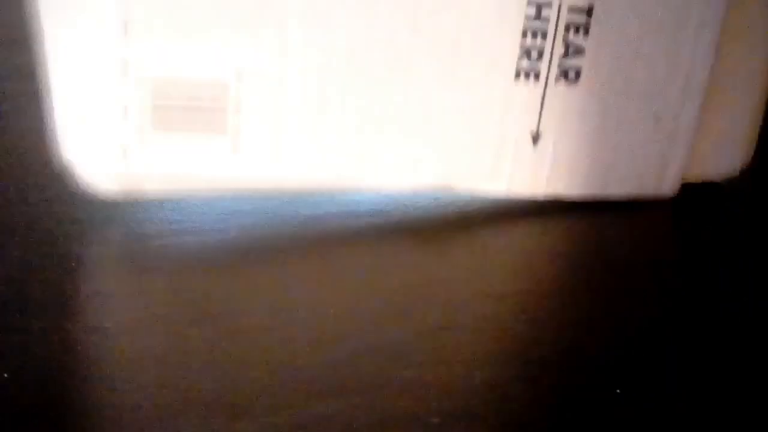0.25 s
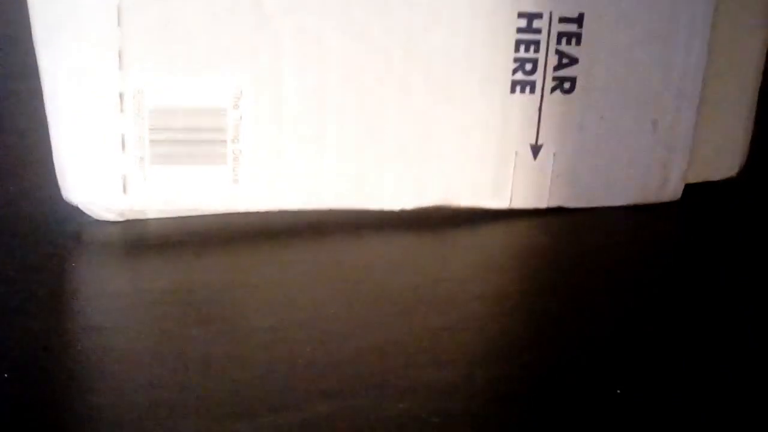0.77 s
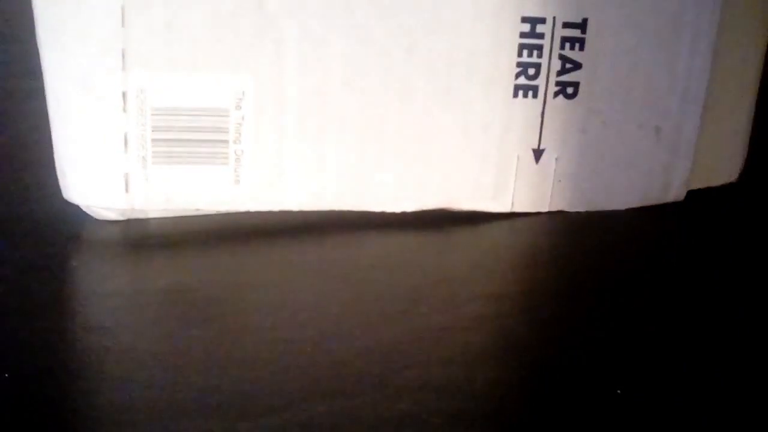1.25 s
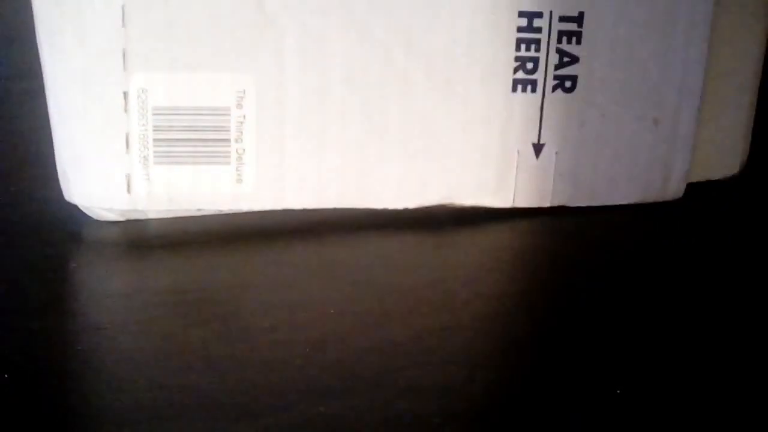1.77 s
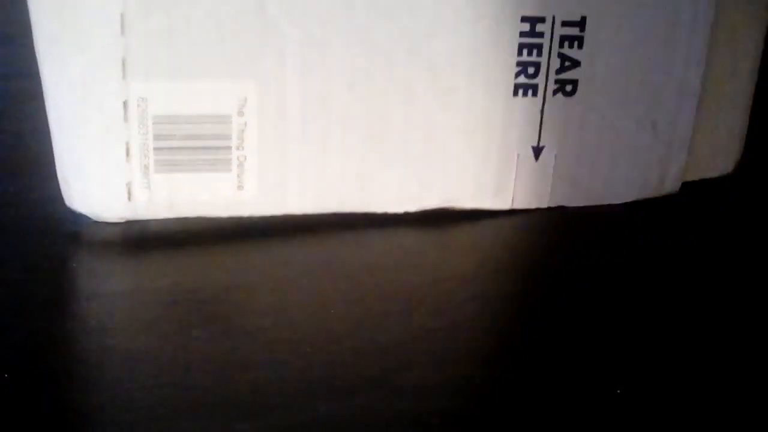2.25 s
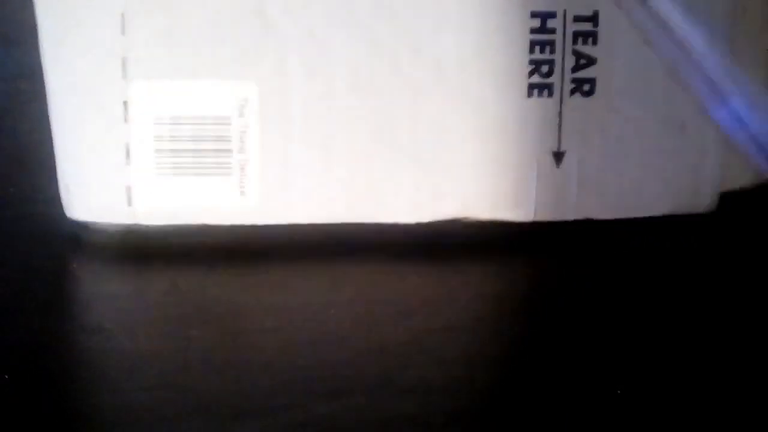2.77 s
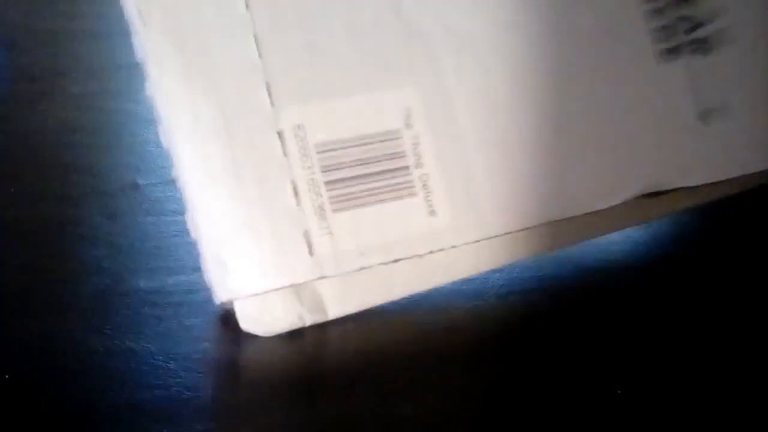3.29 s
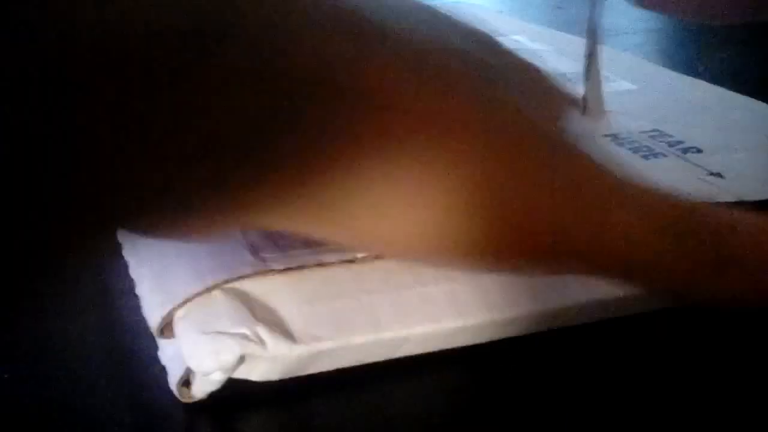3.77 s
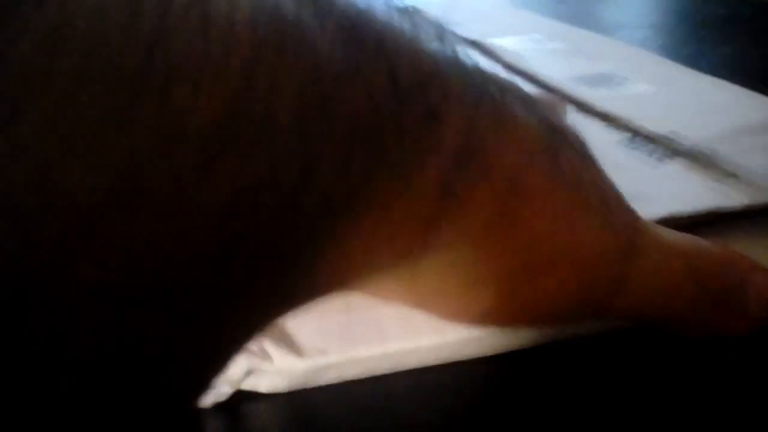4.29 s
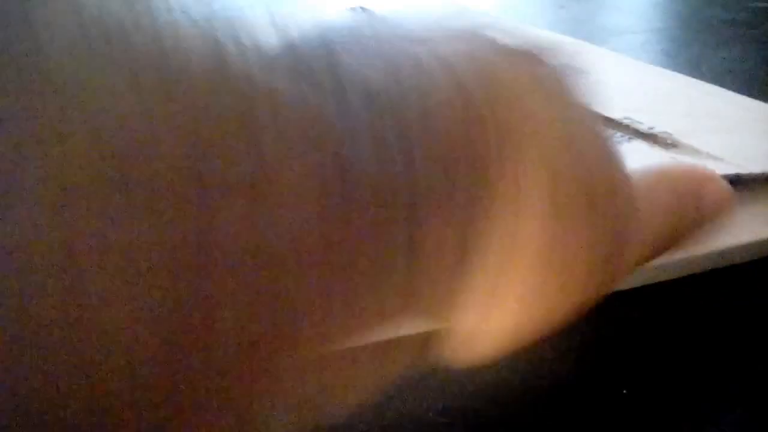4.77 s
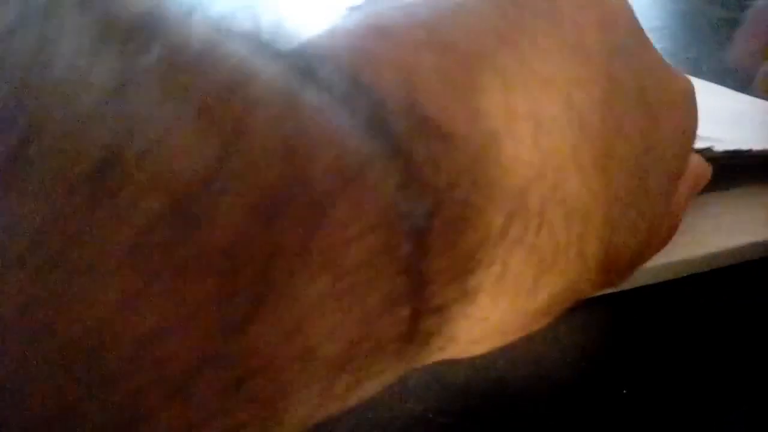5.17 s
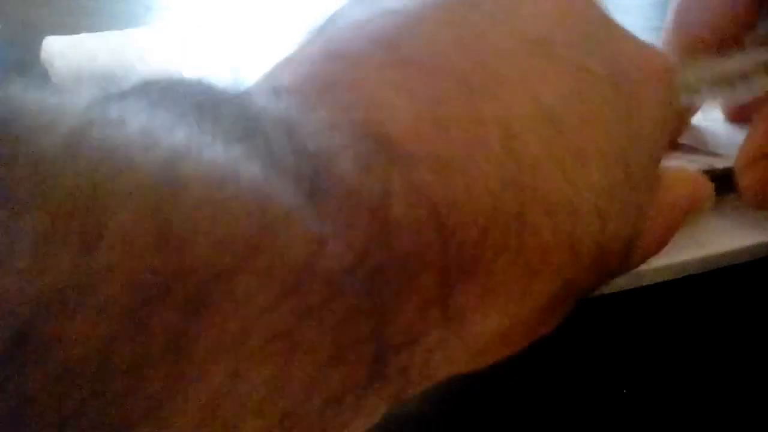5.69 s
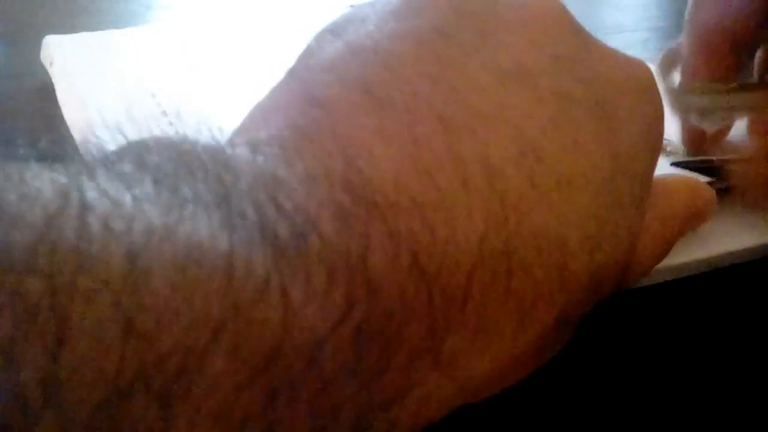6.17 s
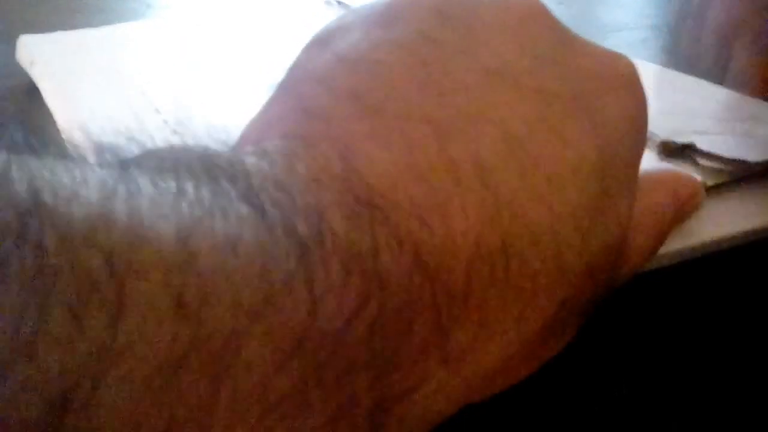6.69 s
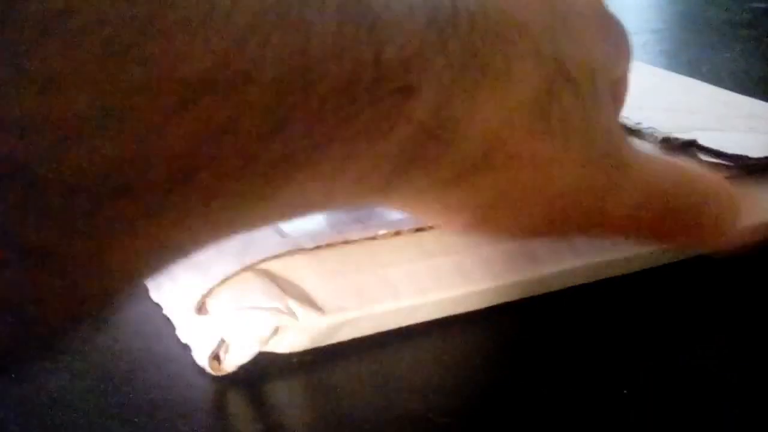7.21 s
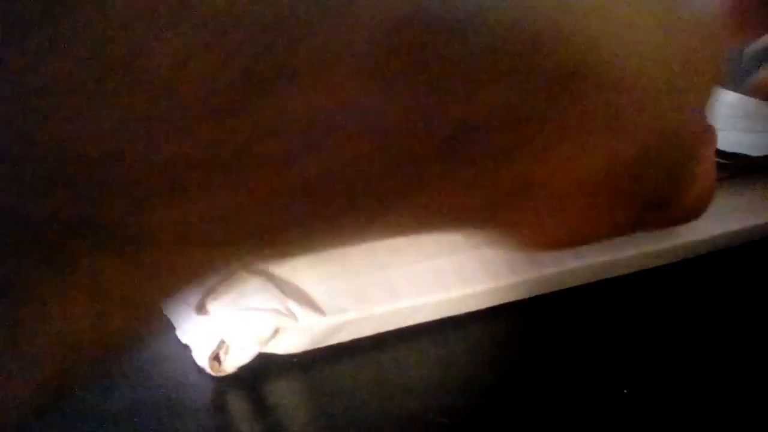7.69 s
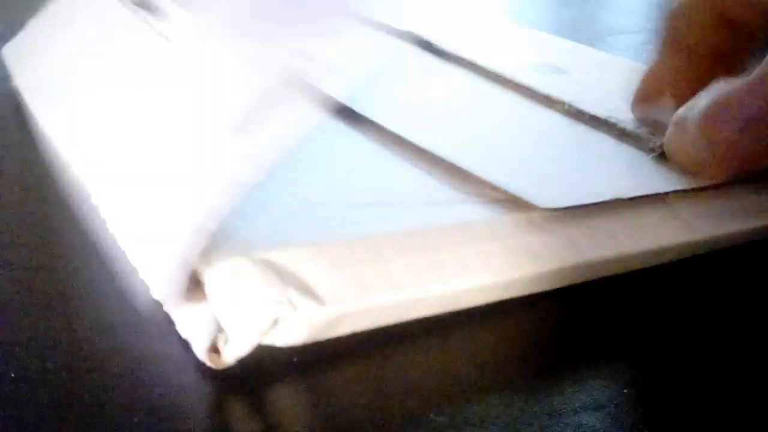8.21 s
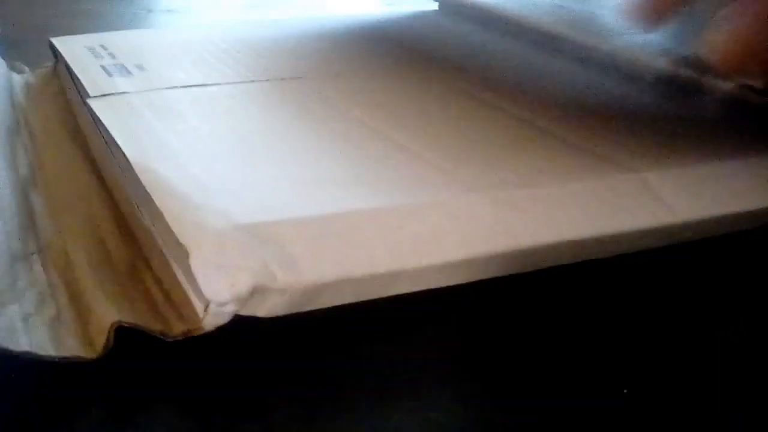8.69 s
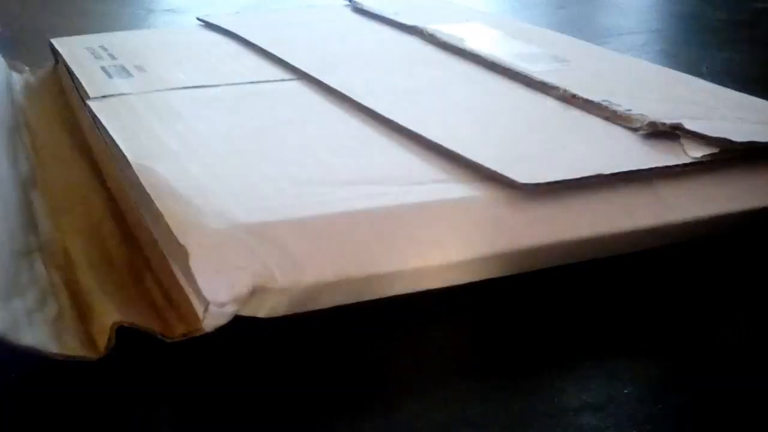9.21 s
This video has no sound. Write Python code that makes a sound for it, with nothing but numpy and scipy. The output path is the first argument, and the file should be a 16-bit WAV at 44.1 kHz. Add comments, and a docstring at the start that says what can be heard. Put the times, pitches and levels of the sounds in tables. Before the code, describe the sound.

A cardboard mailer is ripped open by hand in short buzzing tears, with sharp snaps and light scrapes in a quiet room.

```python
"""A cardboard mailer is torn open by hand on a table, close up in a small quiet room with a faint hum.
First, a few snaps and table bumps; hands and board brush lightly from here on. Pulls at 1.2 s and 2.5 s
rip across the flutes: rough panel buzz, fizz of fibres. Near 3.8 s the flap gives way in sharp snaps.
A third pull at 4.2 s ends with a metallic ping. Scuffs and paper ticks follow; at 8.1 s the flap slaps
open, then light handling continues."""
import sys
import numpy as np
from scipy import signal
from scipy.fft import rfft, irfft, next_fast_len
from scipy.io import wavfile
from scipy.ndimage import uniform_filter1d

SR = 44100
rng = np.random.default_rng(int(sys.argv[2]) if len(sys.argv) > 2 else 0)


def to_wav(s):
    """Save 16-bit WAV."""
    ch = np.atleast_2d(s).T  # columns
    pcm = np.round(np.clip(ch, -1, 1) * 32767)  # PCM
    wavfile.write(sys.argv[1], SR, pcm.astype(np.int16))


N = 416744
TIME_S = np.arange(N) / SR

# Spectra. Each row: frequency in Hz, relative density in dB.
AIR_SPECTRUM = [(15, -34), (25, -20), (91, -12), (113, -10.5), (209, -6), (240, 0.5), (267, -8),
                (359, -9.5), (482, -14.5), (782, -15.5), (848, -15.5), (1410, -19.5), (2360, -25),
                (4600, -33), (6500, -34), (7800, -48), (10900, -56), (15500, -88)]
CRACK_SPECTRUM = [(500, -24.5), (1100, 5), (1400, 0.5), (1650, 6), (1900, 7), (2200, 3.5), (2600, -1),
                  (3050, -0.5), (3450, -3), (3850, -5), (4600, -15), (5400, -11.5), (6500, -9),
                  (8500, -23.5), (11500, -32), (15500, -45)]  # cracking fibres
BUMP_SPECTRUM = [(25, -10), (45, -23), (80, 8), (130, -11.5), (250, -12), (500, -15.5), (1500, -47),
                 (5000, -68)]  # mailer on table
BRUSH_SPECTRUM = [(300, -2), (1000, 9.5), (2500, 6), (4200, 2), (6400, 3.5), (8000, -6), (11000, -10.5),
                  (15500, -24)]  # paper on paper
SKIN_SPECTRUM = [(1500, -18), (4500, -5.5), (6800, 2.5), (8500, -3), (11000, -9), (12300, -19),
                 (15500, -20)]  # fingers on the smooth face
RUB_SPECTRUM = [(300, -26), (800, -1), (1200, 1), (1500, -4.5), (1900, -15), (2600, -11), (6000, -32)]  # edge on panel
PANEL_SPECTRUM_1 = [(26, -46), (45, -24), (76, 3.5), (190, -4.5), (230, -1.5), (322, -5.5), (520, -10.5),
                    (753, -17), (848, -8.5), (939, -16), (1270, -16), (1560, -28.5), (2000, -30.5),
                    (2400, -39), (3380, -64), (5720, -120)]  # board, pulls 1-3
PANEL_SPECTRUM_2 = [(26, -49), (45, -18), (71, -8), (172, 0), (204, -1), (328, -1), (437, 0), (536, -13.5),
                    (680, -15), (834, -18), (1040, -14.5), (1250, -26.5), (1460, -16), (1700, -28.5),
                    (2060, -24.5), (2250, -38), (2600, -35), (3380, -65), (5720, -120)]
PANEL_SPECTRUM_3 = [(26, -16), (45, -12), (80, 3), (158, -5.5), (317, 2.5), (430, -7.5), (564, -3.5),
                    (766, -9.5), (923, -9.5), (1300, -15.5), (2600, -23.5), (3380, -55), (5720, -120)]
FIZZ_SPECTRUM_1 = [(1410, -31), (2400, -4), (3010, -4.5), (3920, -6.5), (5120, -5.5), (6080, -6.5),
                   (7620, -4.5), (15500, -22)]  # tearing fibres, pulls 1-3
FIZZ_SPECTRUM_2 = [(1410, -28), (2400, -5.5), (4480, -4.5), (5240, -2.5), (6320, -2), (11800, -14.5),
                   (15500, -21)]
FIZZ_SPECTRUM_3 = [(1410, -18), (2400, -7), (3740, -6), (4590, -11.5), (6620, -2), (9700, -16.5),
                   (14800, -22), (15500, -25)]

# Mains hum. Each row: frequency in Hz, level in dB.
HUM_PARTIALS = [(120, -61), (238, -63)]
# Fibre bundles snapping. Each row: start in seconds, thud level in dB, panel pitch in Hz,
# crack level in dB, crack decay in seconds, ring of the torn edge in Hz.
SNAPS = [(0.18, -41.5, 870, -37.5, .005, 3320), (0.194, -39.5, 710, -44, 0.0077, 1700),
         (0.2207, -23, 647, -30, 0.0017, 3900), (0.259, -34, 644, -35.5, 0.0026, 1250),
         (0.2694, -25, 524, -35.5, 0.0016, 2190), (1.223, -33, 700, -47, 0.0018, 1200),
         (1.252, -35, 650, -42, .002, 3100), (1.268, -23.5, 600, -36, 0.0056, 3100),
         (1.2891, -24.5, 545, -39, .003, 3100), (1.296, -25, 700, -39, .002, 3100),
         (1.353, -23.5, 700, -41, .003, 1200), (1.365, -27, 640, -35.5, .002, 3300),
         (2.5415, -31.5, 900, -46, .002, 2200), (2.6075, -30, 480, -51, .002, 2200),
         (2.7397, -22, 680, -43, 0.0025, 1450), (2.835, -23, 483, -40, .003, 2000),
         (2.8853, -19, 484, -36, .002, 1600), (2.899, -22.5, 695, -27, .0015, 1550),
         (2.9077, -26, 624, -31.5, .0014, 1990), (2.924, -26, 497, -38, 0.0018, 2000),
         (3.7146, -19, 777, -30.5, 0.011, 1700), (3.737, -22, 484, -31.5, 0.0058, 1700),
         (3.7545, -34, 800, -40, .0012, 3300), (3.7617, -25.5, 615, -39, 0.002, 1900),
         (3.791, -26.5, 700, -29, 0.0015, 2900), (3.7974, -22.5, 468, -33, .0024, 2600),
         (3.8143, -17, 663, -30, 0.002, 2400), (3.8478, -19.5, 414, -17.5, 0.0017, 1700),
         (3.859, -20.5, 634, -31, .0015, 2300), (3.8643, -11.5, 604, -18, 0.002, 1950),
         (3.8829, -17.5, 640, -24.5, 0.0011, 1600), (3.914, -19.5, 534, -24.5, 0.0017, 2800),
         (3.9356, -20.5, 654, -33, 0.0013, 2400), (3.9665, -29.5, 580, -33, 0.0012, 2900),
         (3.987, -24.5, 636, -35, 0.0018, 2300), (4.2583, -32.5, 960, -37.5, .002, 6500),
         (4.2945, -21.5, 550, -33, 0.0037, 1900), (4.3237, -24.5, 644, -33, .0015, 2400),
         (4.353, -31, 740, -40, .002, 1600), (4.3665, -29, 584, -35, 0.002, 3200),
         (4.384, -34, 600, -44, .002, 2300), (4.435, -33, 620, -42, .002, 6800),
         (4.4608, -31, 510, -30.5, 0.0015, 3000), (4.489, -25.5, 517, -33.5, .0012, 2200),
         (4.5168, -26.5, 614, -40, 0.0033, 3400), (4.5275, -28, 710, -26.5, 0.0022, 7800),
         (4.5315, -20, 614, -23.5, .0024, 3200), (4.585, -33.5, 467, -39.5, .0018, 3000),
         (4.623, -23, 520, -32.5, 0.0018, 2000), (4.643, -31.5, 634, -43.5, 0.015, 1900),
         (4.7184, -31.5, 655, -33.5, 0.0016, 2900), (4.7587, -32, 498, -43, 0.0009, 2000),
         (5.976, -42, 507, -42.5, 0.0066, 1700), (6.019, -38, 520, -58, .003, 3200),
         (6.026, -42, 480, -54, .002, 2200), (6.809, -30, 694, -33.5, 0.004, 4300),
         (6.8173, -35, 736, -23.5, 0.0013, 3500), (6.8318, -24.5, 520, -31.5, 0.0022, 1700),
         (6.847, -29.5, 660, -40, 0.0021, 2400), (6.9153, -28.5, 540, -35.5, 0.0014, 2600),
         (7.569, -51.5, 895, -46, .003, 4500)]
# Table bumps. Each row: start in seconds, level in dB, decay in seconds.
BUMPS = [(.182, -33, 0.045), (.33, -40.5, 0.036), (2.53, -28.5, 0.098), (3.29, -49, 0.054),
         (3.715, -34, 0.065), (3.86, -37.5, 0.15), (4.529, -43, 0.1), (5.975, -40, 0.046),
         (6.82, -24, 0.029), (8.082, -38.5, 0.033), (8.97, -49.5, 0.089), (9.239, -49, 0.038)]
# Light strokes. Each row: peak time in seconds, length in seconds, nominal level in dB, skin share 0-1.
STROKES = [(0.36, 0.27, -61, 0), (0.694, 0.49, -65.5, 0.14), (1.1, 0.16, -52, 0.85), (1.6, 0.39, -65, 0.1),
           (1.833, 0.029, -58, 0.72), (2.266, 0.16, -53.5, 0.47), (2.43, 0.089, -59, 0.2),
           (0.927, 0.17, -60.5, 0), (3.045, 0.16, -52, 0), (3.195, 0.05, -52.5, 0.8),
           (3.393, 0.038, -59.5, 1), (3.538, 0.15, -55.5, 0.63), (4.208, 0.25, -53.5, 0),
           (4.936, 0.32, -56.5, 0), (5.133, .09, -63, 0), (5.267, 0.078, -60, 0.03),
           (5.485, 0.095, -61.5, 0.55), (5.72, 0.3, -65, 0.3), (5.933, 0.17, -61.5, 0.35),
           (6.22, 0.25, -63, 0.3), (6.39, 0.047, -54.5, 0.14), (6.69, 0.13, -57, 0),
           (7.047, 0.076, -59.5, 0.15), (7.274, 0.11, -57, 0.5), (7.47, 0.27, -66, 0.12),
           (7.618, 0.054, -54.5, 0), (7.887, 0.19, -63, 0), (8.19, 0.16, -57.5, 0.4),
           (8.405, 0.15, -54.5, 0.2), (8.695, 0.17, -54, 0.05), (8.858, 0.077, -55.5, 0.3),
           (9.053, 0.12, -58.5, 0.66), (9.198, 0.11, -57.5, .6), (9.326, 0.056, -58.5, 0.34),
           (9.43, 0.077, -61.5, 0.4)]
# Hand force, one curve a pull. Each row: time in seconds, panel level in dB, fizz level in dB.
PULL_LEVELS = [
    [(1.16, -65, -58), (1.186, -36, -42.5), (1.218, -36, -49), (1.226, -29.5, -39), (1.258, -25.5, -40.5),
     (1.36, -22, -37), (1.41, -21, -39.5), (1.452, -22, -38.5), (1.47, -31, -49.5), (1.514, -37, -49.5),
     (1.54, -48, -66), (1.56, -64, -51)],
    [(2.45, -62, -58), (2.524, -29, -38.5), (2.558, -26, -43.5), (2.605, -23.5, -41.5),
     (2.645, -27.5, -40.5), (2.685, -19, -39.5), (2.746, -18.5, -38), (2.784, -26, -42),
     (2.855, -22, -41.5), (2.885, -12, -32), (2.908, -14.5, -34.5), (2.942, -31, -55), (2.99, -48, -73)],
    [(4.22, -59, -61), (4.236, -54, -70), (4.248, -36.5, -43), (4.29, -24, -39.5), (4.31, -31, -46.5),
     (4.336, -30.5, -46.5), (4.468, -28, -39.5), (4.51, -43, -51)],
]
# Tear speed, one curve a pull. Each row: time in seconds, flutes per second, freed panel's ring in Hz.
PULL_SPEEDS = [
    [(1.22, 119, 800), (1.255, 139, 846), (1.3, 162, 900), (1.335, 220, 850), (1.35, 244, 800),
     (1.425, 225, 1150), (1.48, 82, 1000)],
    [(2.5, 94.5, 900), (2.6, 91.7, 900), (2.64, 125, 780), (2.69, 250, 720), (2.745, 230, 690),
     (2.81, 117, 760), (2.88, 346, 623), (2.92, 305, 430), (2.96, 121, 430)],
    [(4.22, 100, 600), (4.28, 109, 560), (4.345, 70, 600), (4.4, 112, 540), (4.43, 94, 480),
     (4.47, 120, 560)],
]
# A slow tear stumbles, a fast one runs evenly. Each row: flutes per second, unevenness 0-1.
UNEVEN_BY_SPEED = [(105, .6), (232, .2)]
# Narrow rasp. Each row: top speed so far in flutes per second, pitch in Hz, level in dB re fizz.
RASP_BY_SPEED = [(80, 2900, -26), (120, 3000, -20), (140, 3030, -5), (215, 3100, -6), (239, 5250, -10),
                 (339.8, 5560, -10)]
# Paper edge ticks. Each row: start in seconds, peak in dB, centre in Hz.
TICKS = [(2.018, -51, 500), (3.615, -33.5, 6340), (3.879, -24, 3600), (4.028, -34.5, 2300),
         (4.166, -30, 2560), (5.9177, -34, 2780), (6.627, -41, 2980), (7.279, -42, 6500),
         (7.311, -43, 6000), (7.334, -42, 5000), (7.5694, -28, 3600), (8.038, -40.5, 2200),
         (8.0765, -27, 4000), (8.635, -40, 4000), (8.8843, -40, 4000), (9.003, -47, 7500),
         (9.068, -44, 7000), (9.199, -46, 7500), (9.304, -40, 1800)]
# Edge rubs. Each row: peak time in seconds, half-width in seconds, level in dB.
RUBS = [(2.19, 0.023, -59), (3.05, .03, -53), (2.5, 0.028, -44.5), (2.55, 0.03, -38.5), (5.015, .08, -64),
        (8.218, .02, -57), (8.291, 0.011, -54), (8.68, 0.054, -62), (8.86, 0.057, -65)]
# Board scuffs. Each row: peak time, rise and fall in seconds, hiss level in dB, body level in dB.
SCUFFS = [(3.729, 0.005, 0.024, -42.5, -21.5), (3.81, .025, 0.043, -52, -40),
          (4.168, 0.0029, 0.011, -47, -39.5), (4.575, 0.038, 0.019, -49, -31.5),
          (5.977, 0.017, 0.015, -41.5, -45), (6.017, 0.0041, 0.016, -46, -41),
          (6.782, 0.0091, 0.017, -34, -38.5), (6.82, 0.0088, .026, -38, -36),
          (7.055, 0.0096, 0.0085, -50.5, -54), (8.093, 0.0067, 0.014, -48, -36),
          (8.39, 0.018, .03, -52.5, -57)]
# Modes of a small metal object and of the flap. Each row: frequency in Hz, gain in dB, T60 in seconds.
METAL_PING_MODES = [(1150, -19.5, 0.048), (1406, -16.5, 0.042), (1685, -21, 0.044), (2310, -32, 0.11),
                    (2550, -27, .04), (5970, -21.5, 0.042)]
FLAP_MODES = [(850, -29, 0.0035), (1105, -1, 0.01), (1320, -5, 0.011)]
# Room decay. Each row: frequency in Hz, T60 in seconds.
ROOM_T60 = [(150, 0.39), (600, 0.28), (2000, 0.17), (6000, 0.27), (14000, 0.41)]


def amp(db):
    """Decibels to gain."""
    return 10 ** (np.asarray(db) / 20)


def unit(x):
    """Scales to rms 1."""
    return x / np.sqrt(np.mean(x ** 2) + 1e-20)


def read(points, hz):
    """Interpolates (Hz, value) points on a log-frequency axis."""
    point_hz, value = np.transpose(points)
    return np.interp(np.log(hz + 1), np.log(point_hz + 1), value)


def add(mix, start_s, sound):
    """Mixes a sound in at start_s."""
    part = mix[max(round(start_s * SR), 0):][:len(sound)]
    part += sound[:len(part)]


def colour(x, spectrum, size=4096):
    """Minimum-phase filter: rings only after each click."""
    log_gain = np.log(amp(read(spectrum, abs(np.fft.fftfreq(size, 1 / SR)))))
    taps = np.fft.ifft(np.exp(np.conj(signal.hilbert(log_gain)))).real
    return signal.fftconvolve(x, taps[:size // 2])[:len(x)]


def band(x, hz, kind, order=4):
    """Low-pass or high-pass."""
    return signal.sosfilt(signal.butter(order, hz, kind, fs=SR, output="sos"), x)


def resonate(x, hz, width_hz):
    """Unity-gain resonance following the curve hz."""
    turn, pole = np.exp(2j * np.pi * np.cumsum(hz) / SR), np.exp(-np.pi * width_hz / SR)
    return 2 * (turn * signal.lfilter([1 - pole], [1, -pole], x / turn)).real


def wander(n, per_s):
    """Random drift, rms 1."""
    knots = rng.standard_normal(4096)
    return unit(np.interp(np.arange(n) * per_s / SR % 4095, np.arange(4096), knots))


def running_rms(x, size=1500):
    """Rms over a sliding window of size samples."""
    return np.sqrt(abs(uniform_filter1d(x ** 2, size)) + 1e-12)


def steady(x, size=1500):
    """Flattens slow level changes, keeps the grain."""
    return x / running_rms(x, size)


def modes(rows, t):
    """Sum of decaying sines."""
    return sum(amp(db - 60 * t / t60_s) * np.sin(2 * np.pi * hz * t) for hz, db, t60_s in rows)


def fibres(n, per_s, spread_db):
    """Tiny clicks of breaking fibres, a few much larger than the rest."""
    height = amp(spread_db * np.minimum(rng.exponential(1, n), 4))
    return height * rng.choice([-1., 1.], n) * (rng.random(n) < per_s / SR)


def tick(peak_db, hz, decay_s=0.0013, top_hz=8300, size=1300):
    """Brief noise burst in one broad hump; soft paper has little top."""
    burst = rng.standard_normal(size) * np.exp(-np.arange(size) / (decay_s * SR))
    burst[0] += 3  # first contact
    hump = [(hz / 8, -20), (hz / 2.55, -1), (hz, 0), (1.45 * hz, -6), (4 * hz, -20)]
    click = band(colour(burst, hump), top_hz, "low", order=2)
    return amp(peak_db) * click / abs(click).max()


def background(air_db=-54):
    """Room air and a wavering mains hum."""
    out = amp(air_db) * unit(colour(rng.standard_normal(N), AIR_SPECTRUM))
    for hz, db in HUM_PARTIALS:
        tone = np.sin(2 * np.pi * hz * TIME_S + 0.62 * wander(N, 18))
        out += amp(db) * unit(tone * amp(1.6 * wander(N, 12)))
    return out


def panel_thud(t, hz):
    """The freed panel kicks once and rings briefly; its upper mode differs at each spot."""
    kick = np.exp(-t / 0.00057) * np.sin(2 * np.pi * hz * t)
    ring = np.exp(-t / 0.0035) * (1 - np.exp(-t / 0.00054)) * np.sin(2 * np.pi * 0.976 * hz * t)
    flutter = band(rng.standard_normal(len(t)), 1210, "low")
    flutter *= np.exp(-t / 0.0039) * (1 - np.exp(-t / 0.00062))
    upper_hz = 1.65 * hz * np.exp(0.15 * rng.standard_normal())
    upper = np.exp(-t / 0.0025) * np.sin(2 * np.pi * upper_hz * t)
    thud = band(kick + 0.5 * ring + 0.082 * upper + 0.6 * flutter, 153, "high", order=1)
    return band(thud, 6000, "low", order=2)


def fibre_crack(t, force_db, decay_s, edge_hz):
    """A break spreads through a bundle; harder breaks reach higher, the torn edge favours one pitch."""
    burst = rng.standard_normal(len(t)) * np.exp(-t / decay_s) * (1 - np.exp(-t / 0.00009))
    hz = np.geomspace(500, 15500, 36)
    tilt_db = -0.696 * np.log2(hz / 2500)
    tilt_db += 0.32 * (force_db + 25) * np.maximum(np.log2(hz / 3500), 0)
    edge_db = 5.5 * np.exp(-(np.log2(hz / edge_hz) / 0.24) ** 2)
    spot_db = 1.2 * rng.standard_normal(len(hz))
    return colour(burst, np.column_stack([hz, read(CRACK_SPECTRUM, hz) + tilt_db + edge_db + spot_db]))


def snaps(size=2646):
    """Fibre bundles crack and release the panel."""
    out, t = np.zeros(N), TIME_S[:size]
    gain = np.sqrt(0.01 * SR / size)  # levels count energy as if spread over 10 ms
    for start_s, thud_db, thud_hz, crack_db, decay_s, edge_hz in SNAPS:
        thud = amp(thud_db) * unit(panel_thud(t, thud_hz))
        crack = amp(crack_db) * unit(fibre_crack(t, crack_db, decay_s, edge_hz))
        add(out, start_s, gain * (thud * rng.choice([-1, 1]) + crack))
    return out


def bumps():
    """Dull thumps of the mailer against the table."""
    out, t = np.zeros(N), TIME_S[:SR // 2]
    for start_s, db, decay_s in BUMPS:
        rumble = steady(colour(rng.standard_normal(len(t)), BUMP_SPECTRUM))
        add(out, start_s, amp(db) * rumble * np.exp(-t / decay_s))
    return out


def patchy(x, depth_db=3):
    """The contact patch keeps changing, so each band wavers on its own."""
    centres_hz = np.geomspace(1500, 15000, 9)
    spectrum, hz = rfft(x), np.fft.rfftfreq(N, 1 / SR)
    bands = [irfft(spectrum * np.interp(hz, centres_hz, pick), N) for pick in np.eye(len(centres_hz))]
    return unit(sum(part * amp(depth_db * wander(N, 24)) for part in bands))


def brushing(rise_share=0.54, catch_db=-11.5):
    """Strokes swell and fade: paper gives a broad grain with small catches, skin a thin, high one."""
    paper_power, skin_power = np.zeros((2, N))
    for peak_s, length_s, db, skin_share in STROKES:
        away_s = np.maximum((peak_s - TIME_S) / rise_share, (TIME_S - peak_s) / (1 - rise_share))
        power = (amp(db) * np.exp(-np.minimum(away_s / length_s, 10) ** 0.95)) ** 2
        paper_power += power * (1 - skin_share)
        skin_power += power * skin_share
    scratch = patchy(colour(fibres(N, per_s=4000, spread_db=1.7), BRUSH_SPECTRUM))
    catches = unit(signal.fftconvolve(fibres(N, per_s=50, spread_db=2), tick(0, 3200))[:N])
    whisper = patchy(colour(fibres(N, per_s=9000, spread_db=6), SKIN_SPECTRUM))
    rustle = np.sqrt(paper_power) * (scratch + amp(catch_db) * catches) + np.sqrt(skin_power) * whisper
    glide_hz = 6500 * np.exp(0.25 * wander(N, 9))  # slides with the angle of the hand
    rustle += 0.35 * resonate(rustle, glide_hz, width_hz=880)
    return rustle * amp(1.4 * wander(N, 40) - 1.06)


def bend(x, delay_at_1khz_s):
    """Bending waves in board carry treble faster than bass."""
    size = next_fast_len(len(x) + 4096)
    khz = np.fft.rfftfreq(size, 1 / SR) / 1000
    return irfft(rfft(x, size) * np.exp(-4000j * np.pi * delay_at_1khz_s * np.sqrt(khz)), size)[:len(x)]


def flex(x, depth_db):
    """As the board bends under the hand, its broad resonances swell and fade one by one."""
    centres_hz = np.geomspace(200, 2400, 9)
    out = x.copy()
    for hz, spacing_hz in zip(centres_hz, np.gradient(centres_hz)):
        peak = resonate(x, hz * np.exp(0.097 * wander(len(x), 15.55)), width_hz=0.62 * spacing_hz)
        out += peak * (amp(depth_db * wander(len(x), 26.16)) - 0.6)
    return out


def panel_buzz(drive, flutes_per_s, ring_hz, spectrum):
    """The jolted panel rings; a slow tear rumbles, a fast one bites and buzzes at the flute rate."""
    haste = flutes_per_s / 306
    bass = signal.sosfiltfilt(signal.butter(2, 251, fs=SR, output="sos"), drive)
    treble = band(drive, 1500, "high", order=1)
    drive = drive + 0.67 * haste * treble + (0.57 - 1.46 * haste) * bass
    buzz = 0.6 * haste ** 2 * resonate(drive, flutes_per_s, width_hz=80)
    ring = 0.65 * resonate(drive, ring_hz, width_hz=110)
    return steady(colour(flex(drive + buzz + ring, depth_db=3.5), spectrum), size=1300)


def fibre_fizz(grit, spray, flutes_per_s, spectrum, crackle_db=-8.5):
    """Fine fibres fizz, larger bundles crackle; a rasp climbs with the top speed reached."""
    fizz = unit(colour(grit, spectrum))
    rasp_per_s, rasp_hz, rasp_db = np.transpose(RASP_BY_SPEED)
    top_per_s = np.maximum.accumulate(flutes_per_s)
    rasp = unit(resonate(fizz, np.interp(top_per_s, rasp_per_s, rasp_hz), width_hz=290))
    fizz += amp(np.interp(top_per_s, rasp_per_s, rasp_db)) * rasp
    fizz /= running_rms(band(fizz, 2450, "high"))
    crackle = unit(colour(fibres(len(grit), per_s=130, spread_db=-2) * spray, CRACK_SPECTRUM))
    return fizz + amp(crackle_db) * crackle


def pull(levels, speeds, panel_spectrum, fizz_spectrum, face_share):
    """Each flute gives way with a jolt and a spray of clicks; face_share adds steady tearing between."""
    level_s, panel_db, fizz_db = np.transpose(levels)
    speed_s, speed_per_s, ring_hz = np.transpose(speeds)
    t = np.arange(level_s[0], level_s[-1], 1 / SR)
    n, flutes_per_s = len(t), np.interp(t, speed_s, speed_per_s)
    uneven = np.interp(flutes_per_s, *np.transpose(UNEVEN_BY_SPEED))
    flutes_crossed = np.cumsum(flutes_per_s * np.exp(0.26 * uneven * wander(n, 220))) / SR
    jolts = np.diff(np.floor(flutes_crossed), prepend=0) * amp(2.7 * uneven * rng.standard_normal(n))
    age_s = TIME_S[:n // 8]
    spray_shape = np.exp(-age_s / 0.003) - np.exp(-age_s / 0.001)
    spray = 0.5 + steady(signal.fftconvolve(jolts, spray_shape)[:n])
    grit = steady(fibres(n, per_s=9000, spread_db=2.5) * (spray + face_share))
    shudder = steady(rng.standard_normal(n) * spray)
    drive = steady(bend(jolts, delay_at_1khz_s=0.0015)) + (0.36 + 2.36 * uneven) * shudder
    panel = panel_buzz(drive, flutes_per_s, np.interp(t, speed_s, ring_hz), panel_spectrum)
    fizz = fibre_fizz(grit, spray, flutes_per_s, fizz_spectrum)
    rip = amp(np.interp(t, level_s, panel_db)) * panel + amp(np.interp(t, level_s, fizz_db)) * fizz
    out = np.zeros(N)
    add(out, t[0], rip * signal.windows.tukey(n, 0.05))
    return out


def edge_ticks():
    """Paper edges tick against each other."""
    out = np.zeros(N)
    for start_s, peak_db, hz in TICKS:
        add(out, start_s, tick(peak_db, hz))
    return out


def rubbing():
    """Short hollow rubs of a cardboard edge on the panel."""
    level = sum(amp(db) * np.exp(-((TIME_S - peak_s) / width_s) ** 2) for peak_s, width_s, db in RUBS)
    return level * unit(colour(fibres(N, per_s=1700, spread_db=3), RUB_SPECTRUM))


def scuffs():
    """Board slides on board: gritty hiss over low panel noise."""
    hiss_gain, body_gain = np.zeros((2, N))
    for peak_s, rise_s, fall_s, hiss_db, body_db in SCUFFS:
        shape = np.exp(-np.maximum((peak_s - TIME_S) / rise_s, (TIME_S - peak_s) / fall_s))
        hiss_gain += amp(hiss_db) * shape
        body_gain += amp(body_db) * shape
    grit = fibres(N, per_s=5000, spread_db=3)
    body = band(colour(grit, PANEL_SPECTRUM_3), 1260, "low")
    return hiss_gain * unit(colour(grit, BRUSH_SPECTRUM)) + body_gain * unit(body)


def metal_ping(start_s=4.529):
    """A small metal object, perhaps a key or knife, pings brightly as the third pull ends."""
    out = np.zeros(N)
    add(out, start_s, modes(METAL_PING_MODES, TIME_S[:SR // 4]))
    return out


def flap_slap(start_s=8.0807, echo_s=0.0155, echo_db=-20, tail_db=-42.5, tail_t60_s=0.29):
    """The flap slaps open: hollow pop, echo off a nearby surface, diffuse ring of the open mailer."""
    out, t = np.zeros(N), TIME_S[:SR // 10]
    pop = modes(FLAP_MODES, t) * (1 - np.exp(-t / 0.00077))
    add(pop, 0, tick(peak_db=-10.5, hz=4600, decay_s=0.00085, top_hz=8000))
    add(out, start_s, pop)
    add(out, start_s + echo_s, amp(echo_db) * pop)
    tail = unit(colour(rng.standard_normal(SR // 3), RUB_SPECTRUM))
    add(out, start_s, tail * amp(tail_db - 60 * TIME_S[:len(tail)] / tail_t60_s))
    return out


def room(x, size=22050, reflections_per_s=4000, gap_s=0.006):
    """Small-room reflections, each band dying at its own rate."""
    taps = rng.standard_normal(size) * (rng.random(size) < reflections_per_s / SR)
    hz, t, bands = signal.stft(taps, SR, nperseg=256)
    tail = signal.istft(bands * amp(-60 * t / read(ROOM_T60, hz)[:, None]), SR, nperseg=256)[1]
    tail[:round(gap_s * SR)] = 0
    return signal.fftconvolve(x, tail / np.linalg.norm(tail))[:N]


def scene():
    """Mono mix; loose paper radiates more widely into the room than the held board."""
    rips = pull(PULL_LEVELS[0], PULL_SPEEDS[0], PANEL_SPECTRUM_1, FIZZ_SPECTRUM_1, face_share=1.3)
    rips += pull(PULL_LEVELS[1], PULL_SPEEDS[1], PANEL_SPECTRUM_2, FIZZ_SPECTRUM_2, face_share=1.5)
    rips += pull(PULL_LEVELS[2], PULL_SPEEDS[2], PANEL_SPECTRUM_3, FIZZ_SPECTRUM_3, face_share=0)
    close = rips + snaps() + scuffs() + bumps() + metal_ping()
    loose = edge_ticks() + flap_slap()
    reflections = room(amp(-23) * close + amp(-14.5) * loose)
    return (close + loose + reflections + brushing() + rubbing() + background())[None]


def record(dry):
    """Soft overload on the largest peaks, then a low-pass."""
    ceiling, knee, cutoff_hz = 0.88, 3.6, 15900
    limited = dry / (1 + abs(dry / ceiling) ** knee) ** (1 / knee)
    taps = signal.firwin(511, cutoff_hz, window=("kaiser", 9), fs=SR)
    return signal.oaconvolve(limited, taps[None], "same")


dry = scene()
out = record(dry)
to_wav(out)
```